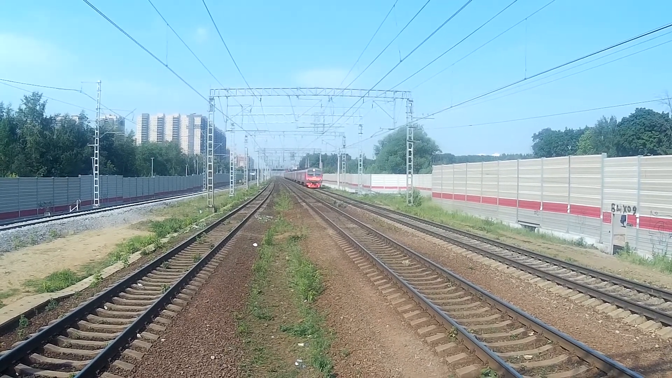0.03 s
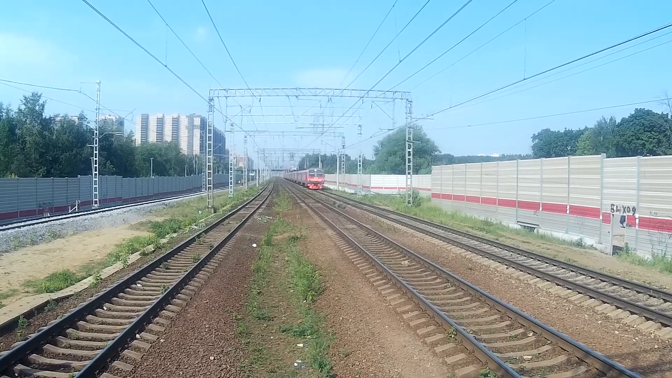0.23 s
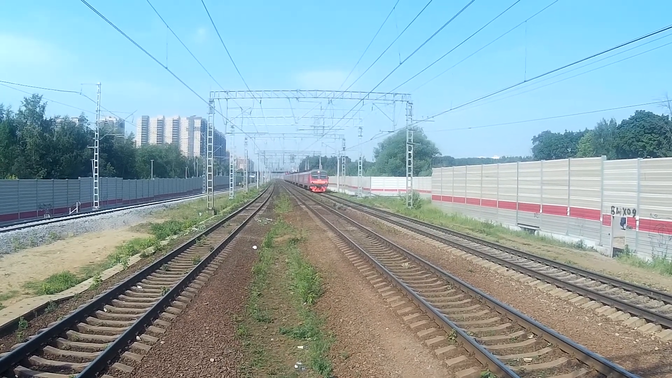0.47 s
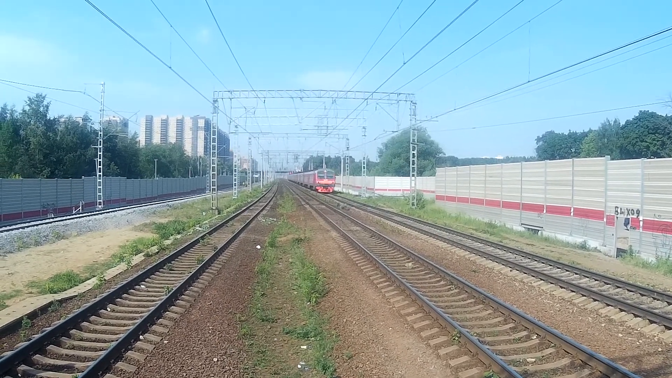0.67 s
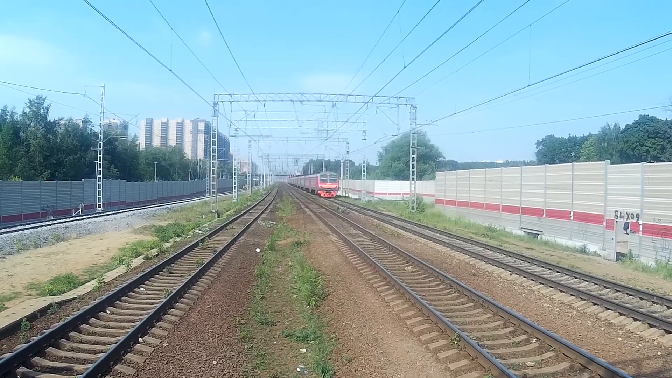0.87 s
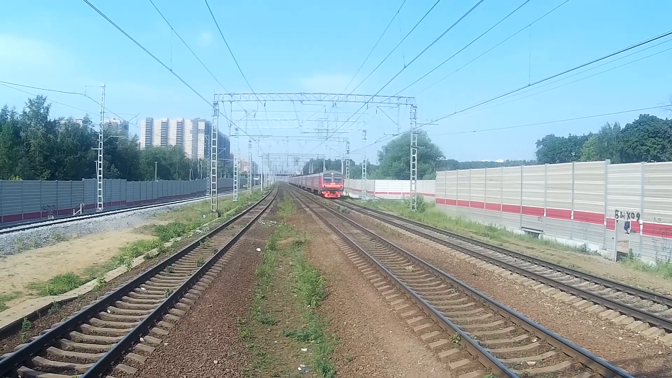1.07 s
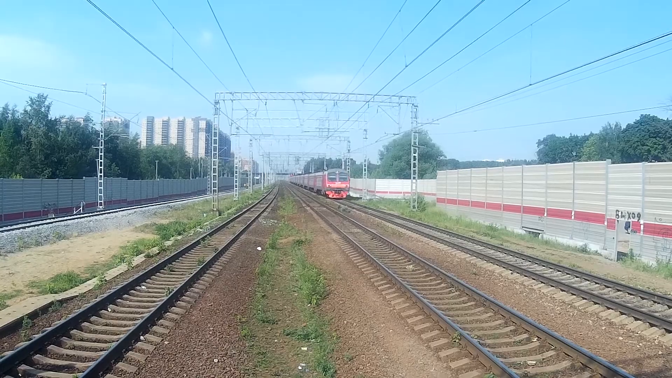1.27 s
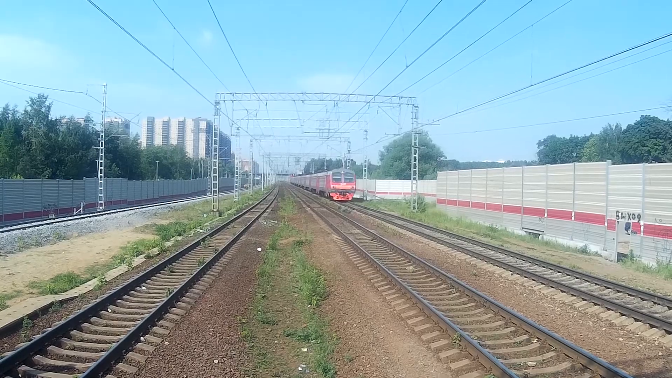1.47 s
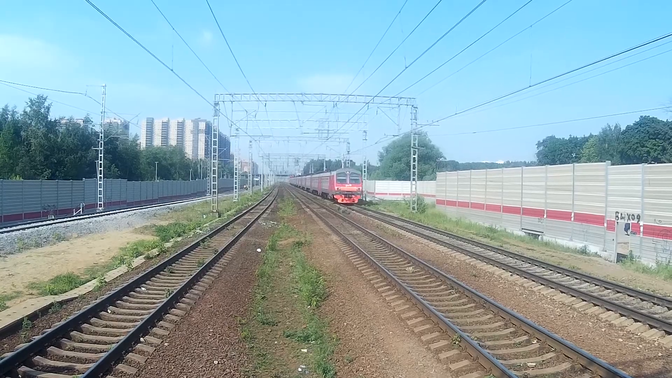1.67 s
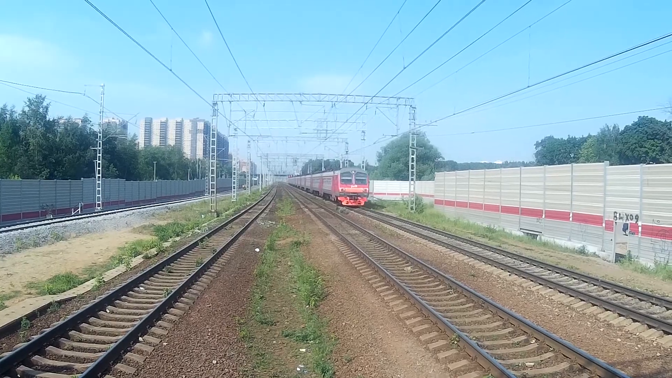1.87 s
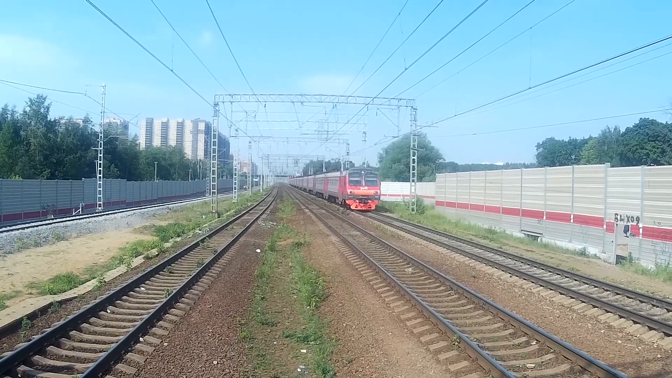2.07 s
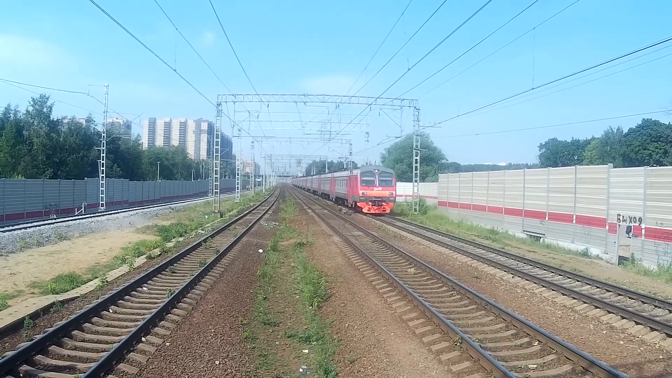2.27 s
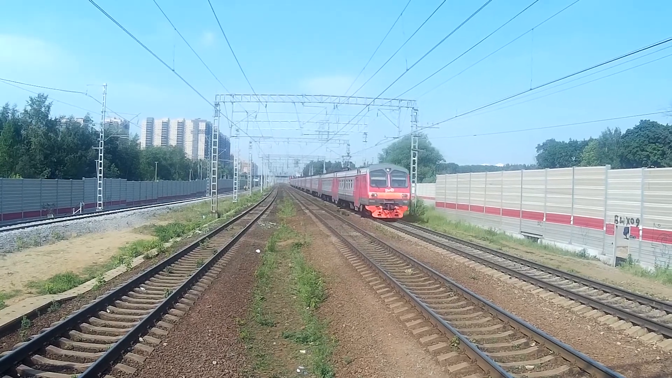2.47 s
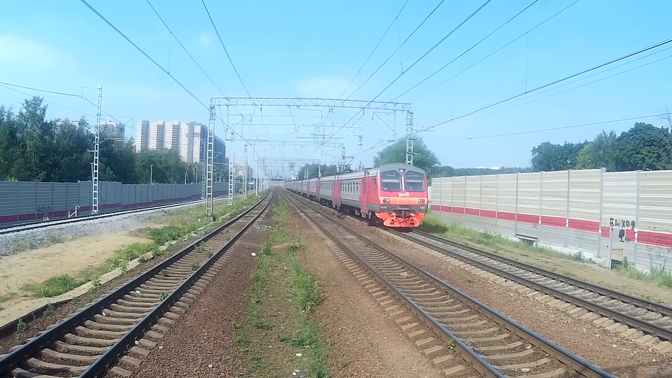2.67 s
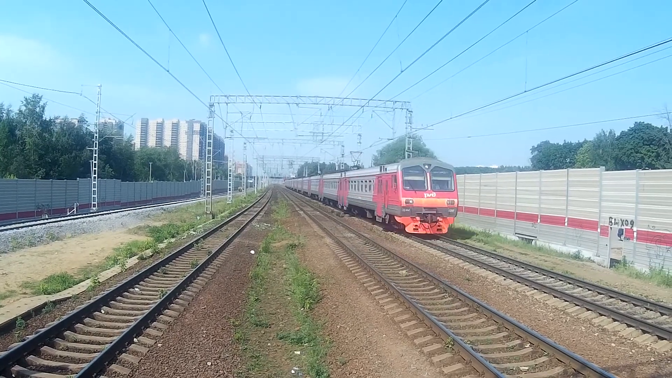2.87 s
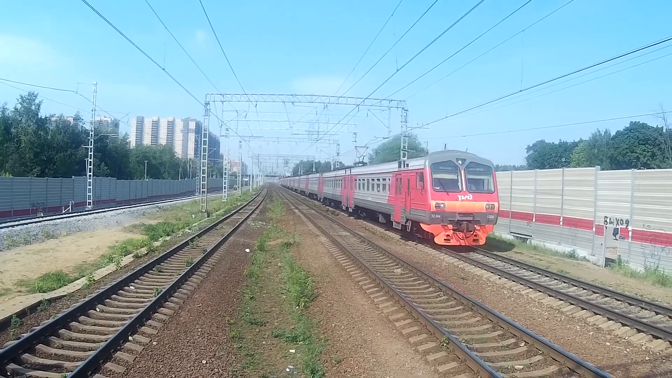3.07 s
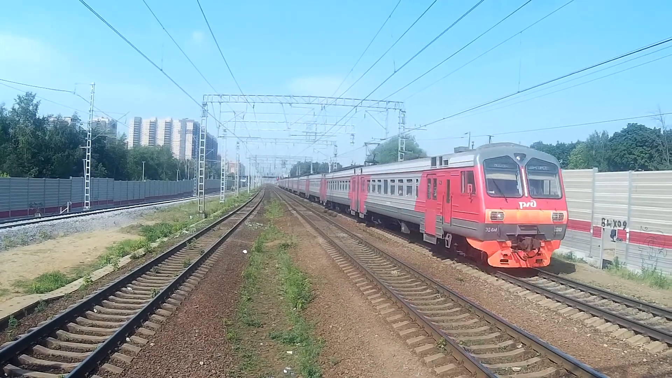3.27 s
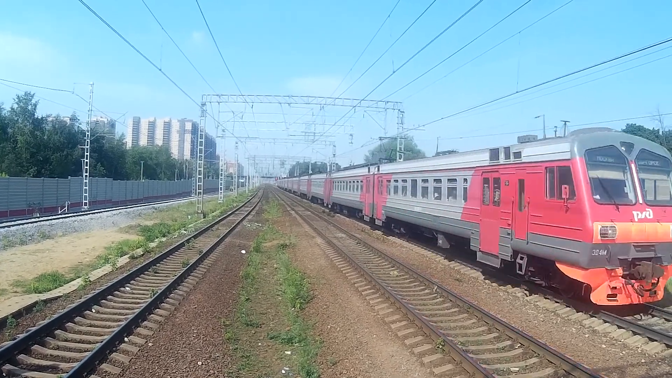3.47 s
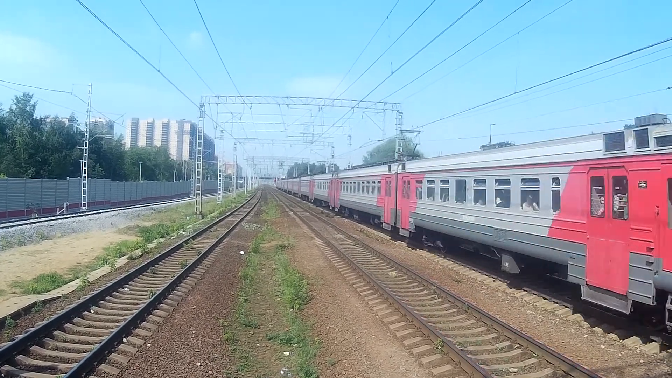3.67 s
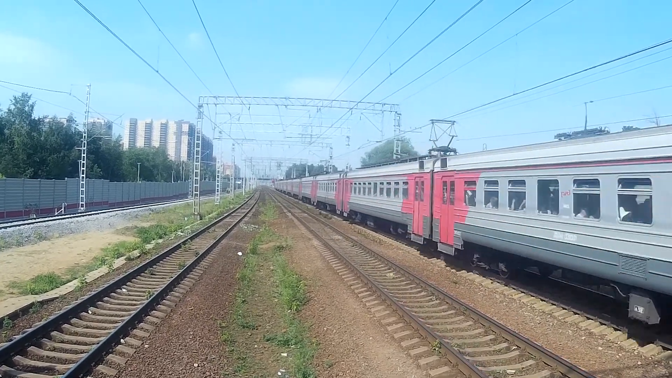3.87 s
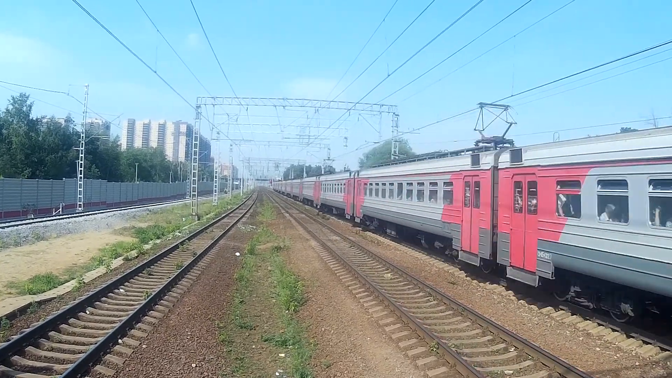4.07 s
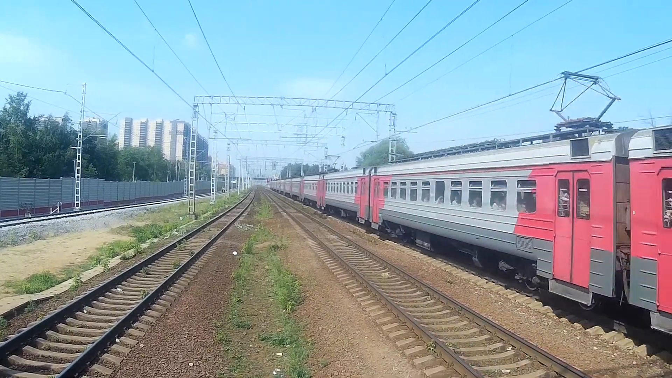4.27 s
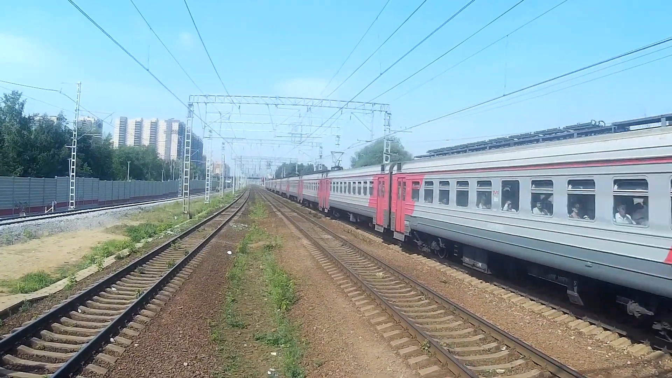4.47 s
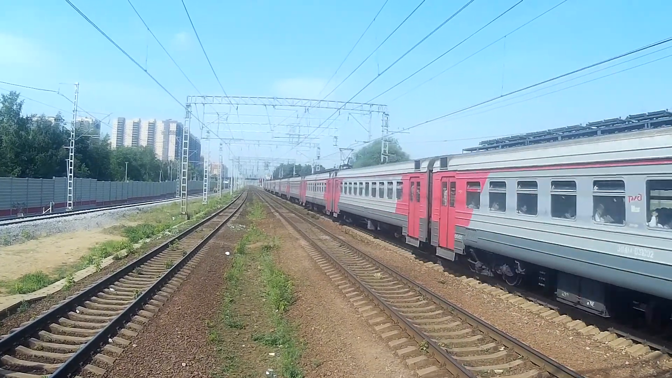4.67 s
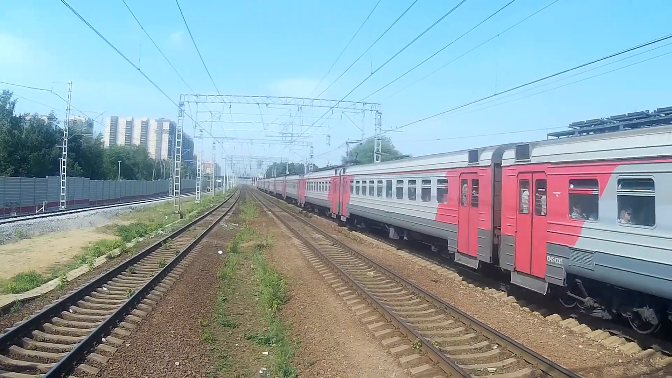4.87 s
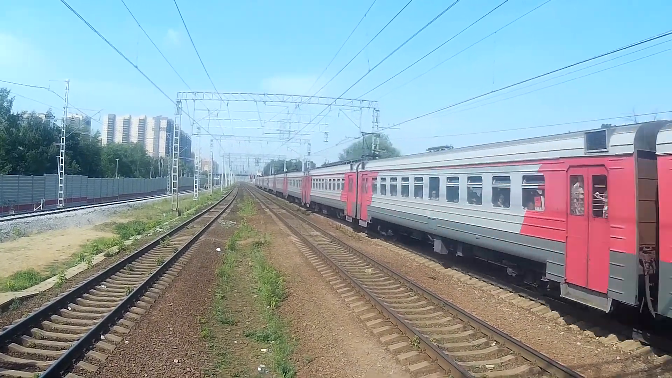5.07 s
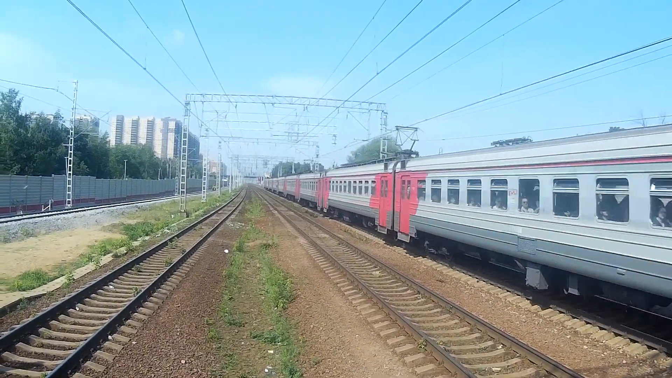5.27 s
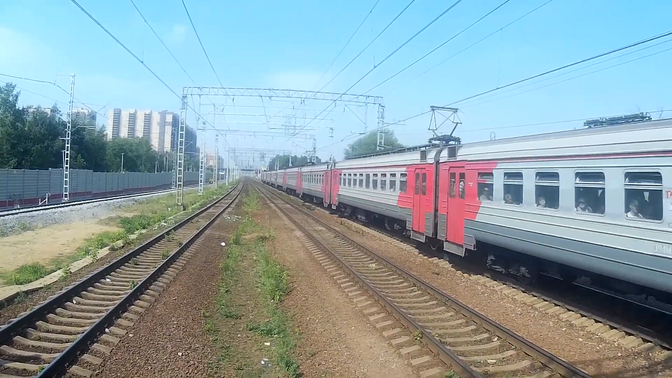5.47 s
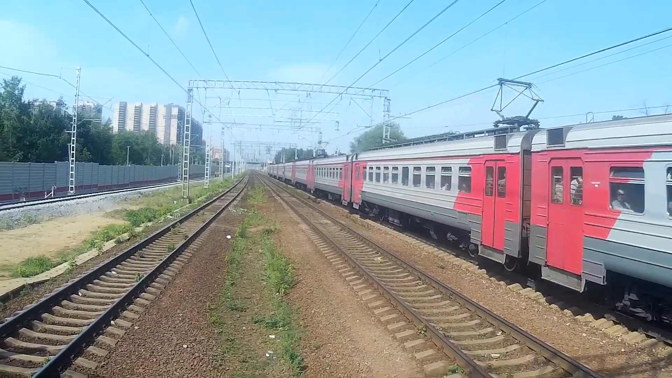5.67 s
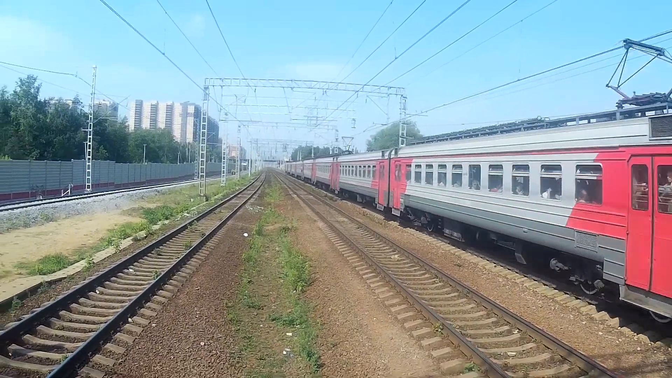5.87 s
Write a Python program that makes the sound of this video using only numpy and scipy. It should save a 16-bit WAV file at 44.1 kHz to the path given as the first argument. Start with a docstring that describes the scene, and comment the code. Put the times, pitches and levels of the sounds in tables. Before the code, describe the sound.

Humming, wavering rail noise swells from far off, steel knocks and rings, then train cars pound past in a loud, slightly distorted roar.

```python
"""An electric commuter train comes down a straight line and rushes past a few metres from a phone.
First a far roar of filtered noise and a faint breeze; then rail resonances sing and hiss ahead of the
wheels, with knocks, narrow rings sinking in pitch and the steps of two joints; then the bogies roar by
as swells of shaped noise, with thuds and a low rumble. The phone clips the loudest peaks."""
import sys
import numpy as np
from scipy import signal
from scipy.fft import rfft, irfft
from scipy.io import wavfile
from scipy.ndimage import uniform_filter1d

SR = 44100
rng = np.random.default_rng(int(sys.argv[2]) if len(sys.argv) > 2 else 0)


def waveform_to_disk(signal):
    """Save audio, clipped to [-1, 1], as 16-bit WAV at the path in sys.argv[1]."""
    frames = np.transpose(np.atleast_2d(signal))
    scaled = np.clip(frames, -1, 1) * 32767
    samples = np.round(scaled).astype(np.int16)
    wavfile.write(sys.argv[1], SR, samples)


N = 261072
T = np.arange(N) / SR
HZ = np.maximum(np.arange(N // 2 + 1) * SR / N, 1)

SPEED_M_S, FRONT_PASSES_S = 29, 3.93
AHEAD_M = SPEED_M_S * np.maximum(FRONT_PASSES_S - T, 0)  # distance of the front; 0 once it has passed
AIR_LOSS_DB_PER_M = 0.031


def undb(db):
    """Decibels to gain."""
    return 10 ** (np.asarray(db) / 20)


def colour(points):
    """Gain at every frequency from (freq_hz, level_db) points, falling 46 dB per octave past both ends."""
    hz, db = np.transpose(points)
    octaves_below = np.maximum(np.log2(hz[0] / HZ), 0)
    octaves_above = np.maximum(np.log2(HZ / hz[-1]), 0)
    inside_db = np.interp(np.log(HZ), np.log(hz), db)
    return undb(inside_db - 46 * (octaves_below + octaves_above))


def resonance(hz, width_hz):
    """Gain of a resonance with steep skirts, 1 at its centre."""
    detuning = (HZ ** 2 - hz ** 2) / (HZ * width_hz * 1.5)
    return 1 / (1 + detuning ** 2)


def modes(table):
    """Summed gain of (freq_hz, width_hz, level_db) resonances."""
    return sum(undb(db) * resonance(hz, width_hz) for hz, width_hz, db in table)


def shaken(response, band_hz=(0, SR)):
    """A body driven by random roughness, with rms 1 inside the band."""
    spectrum = rfft(rng.standard_normal(N)) * response
    inside = (HZ >= band_hz[0]) & (HZ <= band_hz[1])
    return irfft(spectrum, N) / np.std(irfft(spectrum * inside, N))


def walk(rate_hz):
    """Smooth random wander with a spread near 1."""
    k = max(int(SR / rate_hz), 2)
    steps = np.repeat(rng.standard_normal(N // k + 1), k)
    smooth = uniform_filter1d(uniform_filter1d(steps, k), k)
    return 1.2 * smooth[:N]


def blows(table, response):
    """Each blow shakes a body in a short swell that dies more slowly than it rises."""
    envelope = np.zeros(N)
    for peak_s, db, scale_s in table:
        time_constant_s = np.where(T < peak_s, scale_s / 2, scale_s * 2)
        envelope += undb(db) * np.exp(-np.abs(T - peak_s) / time_constant_s)
    return envelope * shaken(response)


def spreading(metres, near_m):
    """Gain at a distance, relative to a nearer one: spreading and loss in the air."""
    return near_m / metres * undb(-AIR_LOSS_DB_PER_M * (metres - near_m))


# far rolling noise spectrum: freq_hz, level_db (relative)
FAR_SPECTRUM = [(100, -45), (160, -15), (210, -3), (256, -2.5), (326, -1), (415, -4.5), (590, -9),
                (750, -2), (928, -1.5), (1230, -10.5), (1570, -3.5), (2140, -18.5), (2760, -19.5),
                (3130, -33), (3660, -28), (5000, -40.5), (6500, -73), (11000, -120)]
# rail and wheel resonances heard from far off: freq_hz, width_hz, level_db (relative)
FAR_RESONANCES = [(765, 120, -0.5), (910, 140, 0.5), (1520, 100, -3.5)]
FAR_DB, FAR_NEAREST_M = -38, 51  # grows until the front is this near, then holds


def far_train():
    """Rolling noise of the whole train with humming resonances, dulled by distance and wavering in the air."""
    broad = undb(-3) * shaken(colour(FAR_SPECTRUM))
    hum = undb(-9) * shaken(modes(FAR_RESONANCES))
    waver = undb(0.5 * walk(14))
    distance_gain = spreading(np.maximum(AHEAD_M, FAR_NEAREST_M), FAR_NEAREST_M)
    return undb(FAR_DB) * distance_gain * (broad + hum) * waver


# deep rumble spectrum: freq_hz, level_db (relative)
RUMBLE_SPECTRUM = [(18, -6.5), (35, -3.5), (60, 1), (80, -3), (105, -8.5), (170, -10.5)]
RUMBLE_DB, RUMBLE_REACH_M, BREEZE_DB = -36, 24.4, -58  # level alongside, size of shaken stretch, breeze


def rumble():
    """Deep buffeting of air and ground shaken by the moving cars, over a faint breeze."""
    level = undb(RUMBLE_DB) * spreading(np.hypot(AHEAD_M, RUMBLE_REACH_M), RUMBLE_REACH_M)
    return np.hypot(level, undb(BREEZE_DB)) * shaken(colour(RUMBLE_SPECTRUM))


CROSSING_S = 0.22  # the leading wheels take this long to cross a joint


def along_rail(lead_m, loss_db_per_m, joint_s, joint_db):
    """Gain of sound running ahead in the rail: it fades with distance and at each joint not yet crossed."""
    barred_db = sum(db * np.clip(0.5 + (s - T) / CROSSING_S, 0, 1) for s, db in zip(joint_s, joint_db))
    return undb(-loss_db_per_m * np.maximum(AHEAD_M - lead_m, 0) - barred_db)


# rail joints, also heard in steel_hiss: crossed_s, singing_loss_db, hiss_loss_db
RAIL_JOINTS = [(1.74, 0, 1.5), (2.32, 12.5, 11)]
# broad rail spectrum: freq_hz, level_db (relative)
RAIL_SPECTRUM = [(88, -47), (135, -14.5), (220, -9), (323, -9.5), (377, -5), (463, -9.5), (646, -16.5),
                 (715, -5.5), (867, -4.5), (985, -1), (1390, -12.5), (1640, -1.5), (1820, -9.5),
                 (2180, -14.5), (3200, -31.5), (4160, -59), (7040, -120)]
# bending resonances of the rail: freq_hz, width_hz, level_db (relative)
RAIL_RESONANCES = [(973, 43, 0.5), (1125, 55, -7.5), (1644, 58, -1), (2166, 36, -15)]
# wheels knocking over rail flaws: peak_s, level_db, scale_s (rise scale/2, fall scale*2)
RAIL_KNOCKS = [(1.76, -39.5, 0.016), (1.82, -41, 0.032), (2.35, -33, 0.035), (2.815, -30, 0.0089),
               (3.0, -15.5, 0.0056), (3.6, -19, 0.015), (3.965, -21, 0.02)]
SING_DB, SING_LEAD_M, SING_LOSS_DB_PER_M = -25.5, 22.8, 0.26  # full level, reached this far ahead


def rails():
    """Wheel roughness and knocks drive the rails' resonances."""
    joint_s, joint_db, _ = np.transpose(RAIL_JOINTS)
    level = undb(SING_DB) * along_rail(SING_LEAD_M, SING_LOSS_DB_PER_M, joint_s, joint_db)
    sing_band_hz = (1450, 1850)  # sets the level
    ringing, broad = modes(RAIL_RESONANCES), colour(RAIL_SPECTRUM)
    singing = undb(-4) * shaken(broad, sing_band_hz) + undb(-6) * shaken(ringing, sing_band_hz)
    flutter = undb(1.1 * walk(45))
    return level * singing * flutter + blows(RAIL_KNOCKS, ringing + 0.28 * broad)


# steel hiss spectrum: freq_hz, level_db (relative)
STEEL_SPECTRUM = [(1760, -16), (3000, -8.5), (3320, -8), (3720, 3.5), (4230, 1.5), (4770, -5.5),
                  (5280, -8.5), (6870, -18), (7910, -20.5), (9110, -37), (11000, -24.5), (15000, -34)]
# high resonances of the rail: freq_hz, width_hz, level_db (relative)
STEEL_RESONANCES = [(3710, 360, -0.5), (4280, 230, -0.5), (5290, 220, -8.5), (7900, 680, -20),
                    (10600, 1200, -23.5)]
HISS_DB, HISS_LEAD_M, HISS_LOSS_DB_PER_M = -44.5, 21, 0.34
TOP_LIFT_DB_PER_M = 0.1  # the top loses this much less per metre
BOGIE_HISS_DB = -29.5  # relative to the bogie roar level
DIP_S, DIP_SIGMA_S, DIP_DB = 3.69, 0.11, -3.5  # the hiss dips briefly


def steel_hiss():
    """Fine roughness hisses in the rails' high resonances; its top fades less with distance than the rest."""
    joint_s, _, joint_db = np.transpose(RAIL_JOINTS)
    carried = undb(HISS_DB) * along_rail(HISS_LEAD_M, HISS_LOSS_DB_PER_M, joint_s, joint_db)
    under_wheels = undb(BOGIE_HISS_DB) * bogie_level()
    dip = undb(DIP_DB * np.exp(-((T - DIP_S) / DIP_SIGMA_S) ** 2 / 2))
    level = np.hypot(carried, under_wheels) * dip
    broad = undb(-1) * shaken(colour(STEEL_SPECTRUM))
    ringing = undb(-3.5) * shaken(modes(STEEL_RESONANCES))
    hiss = broad + ringing
    top = irfft(rfft(hiss) / (1 + (7000 / HZ) ** 6), N)  # above about 7 kHz
    top_lift = undb(TOP_LIFT_DB_PER_M * np.maximum(AHEAD_M - HISS_LEAD_M, 0))
    flicker = undb(0.5 * walk(30))
    return level * (hiss - top + top * top_lift) * flicker


# narrow-band rings and swells of rails and wheels: peak_s, sigma_s, pitch_hz (at peak), width_hz, level_db
NARROW_RINGS = [ (1.952, .2, 3720, 200, -70), (2.82, 0.013, 1670, 89, -25.5), (3.352, .25, 1130, 149, -30),
                (3.59, 0.07, 320, 92, -33), (3.723, .09, 1655, 60, -28.5), (3.8, .015, 5800, 150, -58),
                (3.974, 0.045, 1005, 110, -17.5), (4.148, 0.16, 2210, 50, -38.5),
                (4.279, 0.15, 1065, 150, -20.5), (4.334, 0.05, 4270, 130, -41.5),
                (4.321, 0.18, 1604, 129, -24), (4.72, 0.066, 258, 34.5, -22), (4.808, 0.36, 686, 35, -17),
                (4.905, 0.19, 2380, 143, -29.5), (5.406, 0.047, 1020, 130, -16.5),
                (5.546, 0.099, 4130, 140, -45), (5.562, 0.09, 1550, 130, -21),
                (5.751, 0.12, 1025, 149, -14), ]
DOPPLER_PER_S = 0.06  # fraction of pitch lost per second


def narrow_rings():
    """Narrow-band rings that swell, fade and sink in pitch while the train nears and passes."""
    out = np.zeros(N)
    for peak_s, sigma_s, pitch_hz, width_hz, db in NARROW_RINGS:
        since_s = T - peak_s
        heard_s = T - DOPPLER_PER_S * since_s ** 2 / 2
        ring = np.interp(heard_s, T, shaken(resonance(pitch_hz, width_hz)))
        out += ring * undb(db) * np.exp(-(since_s / sigma_s) ** 2 / 2)
    return out


# bogies going by: loudest_s, level_db
BOGIE_PASSES = [(4.05, -24.5), (4.529, -14), (4.8, -20.5), (5.08, -17), (5.45, -16.5), (6.0, -14.5)]
BOGIE_REACH_M, BOGIE_FALL_DB_PER_DOUBLING = 10.66, 9
BOGIE_SHADOW_DB_PER_M = 0.22  # cars hide the farther bogies


def bogie_level():
    """Gain of all the bogies, summed in power; each swells and fades with its distance."""
    power = 0
    for loudest_s, db in BOGIE_PASSES:
        metres = np.hypot(BOGIE_REACH_M, SPEED_M_S * (T - loudest_s))
        fall_db = BOGIE_FALL_DB_PER_DOUBLING * np.log2(metres / BOGIE_REACH_M)
        shadow_db = BOGIE_SHADOW_DB_PER_M * (metres - BOGIE_REACH_M)
        power = power + undb(db - fall_db - shadow_db) ** 2
    return np.sqrt(power)


# bogie roar spectrum: freq_hz, level_db (relative)
BOGIE_SPECTRUM = [(60, -32), (90, -17), (135, -20), (183, -18), (253, -11.5), (321, -10), (477, -3),
                  (573, -4.5), (698, -2), (1070, -3), (1240, -6.5), (1580, -8.5), (1850, -17.5),
                  (2070, -13.5), (3200, -42), (4160, -73), (7040, -120)]
# heavy thuds of passing axles: peak_s, level_db, scale_s (rise scale/2, fall scale*2)
AXLE_THUDS = [(2.56, -32, .015), (3.8, -22, .012), (4.25, -11.5, .012), (4.5, -9.5, .025),
              (4.68, -7.5, .018), (4.795, -6, .012), (4.885, -9.5, .014), (4.995, -11, .01),
              (5.05, -13, .02), (5.13, -12, .008), (5.23, -13, .014), (5.3, -14, .012), (5.465, -13, .01),
              (5.7, -14, .012), (5.79, -13, .012)]


def bogies():
    """Wheels, sleepers and underframes roar with a random judder while axle thuds shake the same body."""
    body = colour(BOGIE_SPECTRUM)
    roar = shaken(body, (400, 850))  # band that sets the level, Hz
    judder = undb(1.3 * walk(35))
    return bogie_level() * roar * judder + blows(AXLE_THUDS, body)


def scene():
    """All sources at one microphone."""
    return (far_train() + rumble() + rails() + steel_hiss() + narrow_rings() + bogies())[None]


PHONE_HISS_DB, FULL_SCALE, TOP_HZ = -68, 0.7, 15500


def record(dry):
    """The phone adds faint hiss, clips the peaks flat and cuts the top."""
    hiss = undb(PHONE_HISS_DB) * rng.standard_normal(dry.shape)
    clipped = np.clip(dry + hiss, -FULL_SCALE, FULL_SCALE)
    top_cut = signal.ellip(10, 0.1, 80, TOP_HZ, fs=SR, output="sos")
    return signal.sosfilt(top_cut, clipped)


dry = scene()
out = record(dry)
waveform_to_disk(out)
```